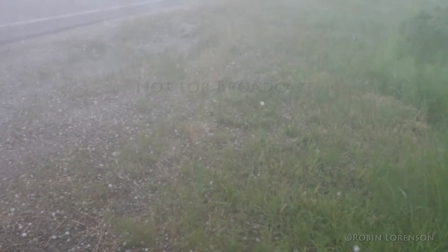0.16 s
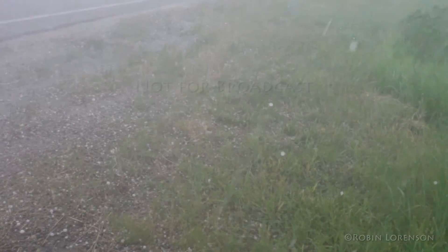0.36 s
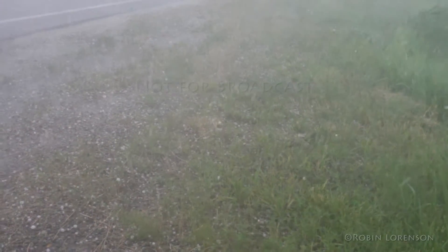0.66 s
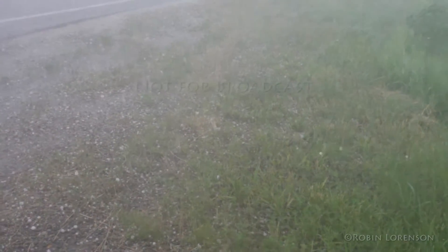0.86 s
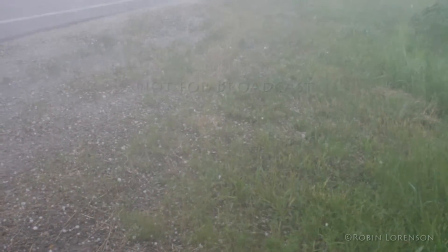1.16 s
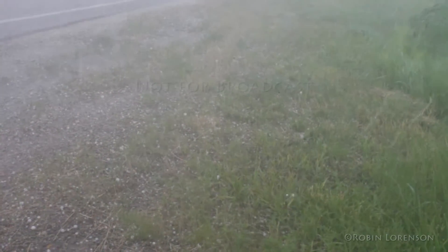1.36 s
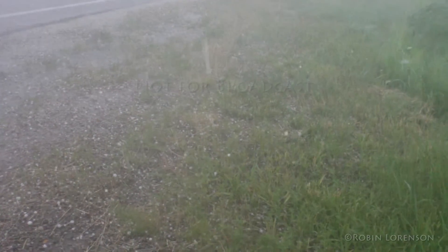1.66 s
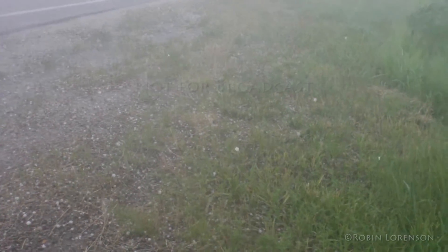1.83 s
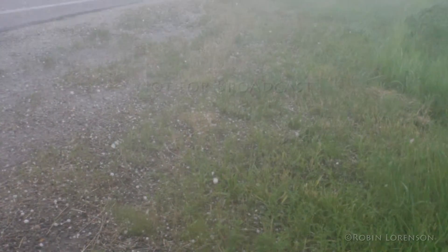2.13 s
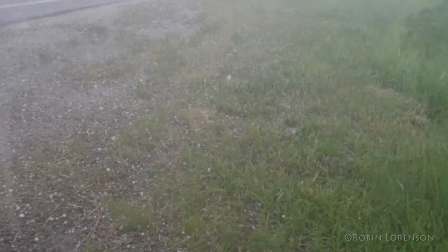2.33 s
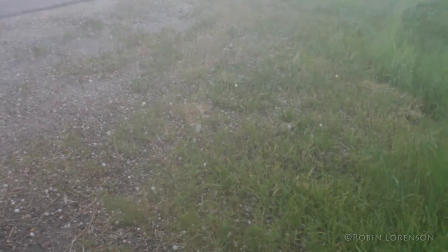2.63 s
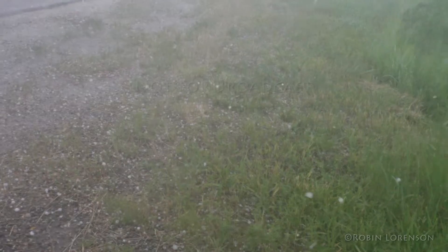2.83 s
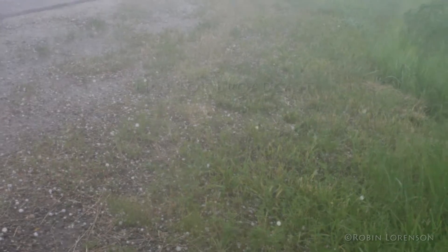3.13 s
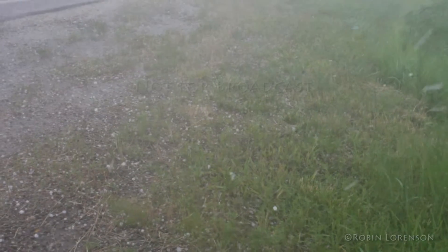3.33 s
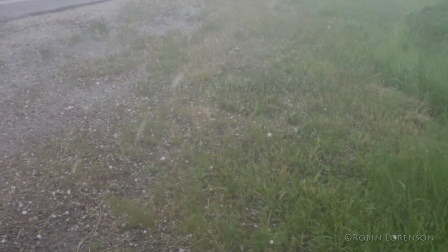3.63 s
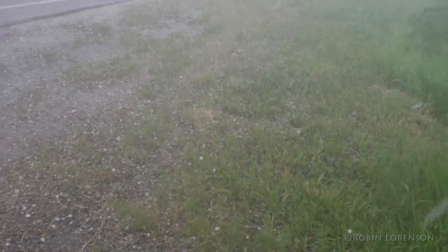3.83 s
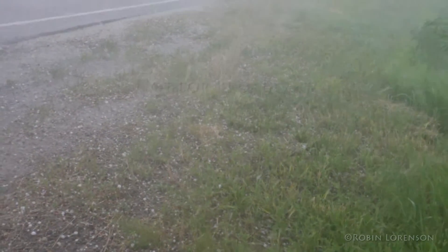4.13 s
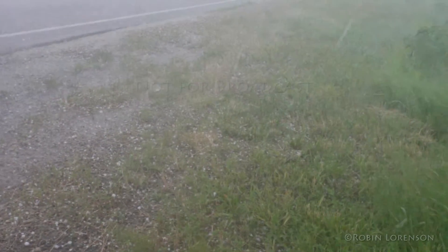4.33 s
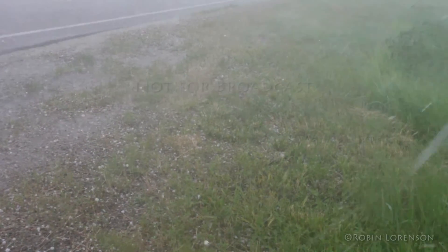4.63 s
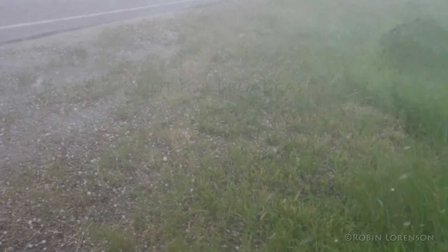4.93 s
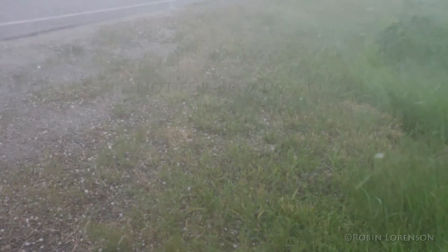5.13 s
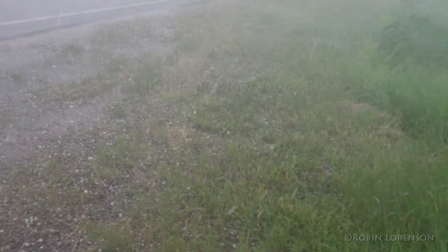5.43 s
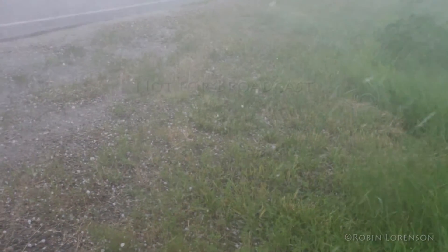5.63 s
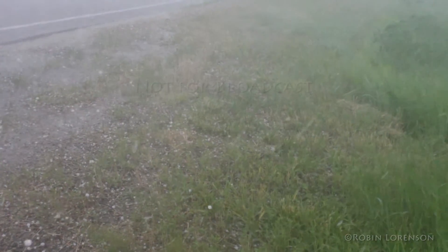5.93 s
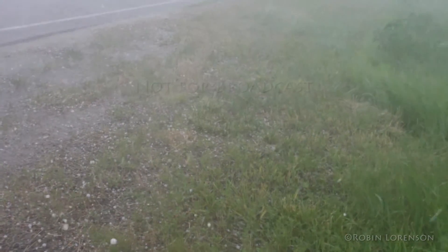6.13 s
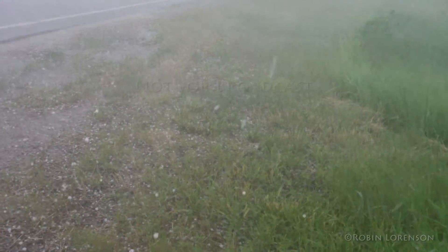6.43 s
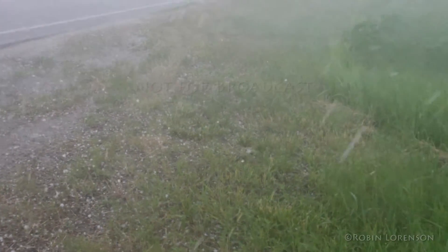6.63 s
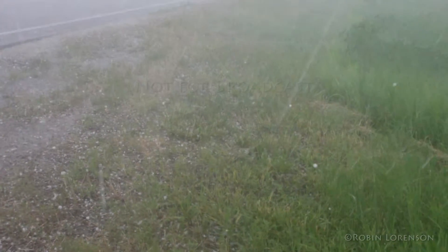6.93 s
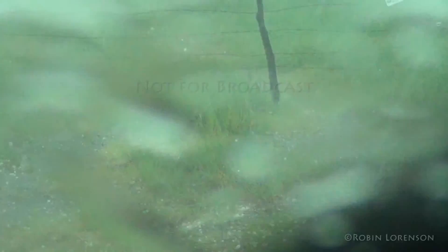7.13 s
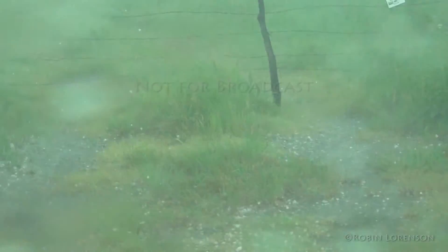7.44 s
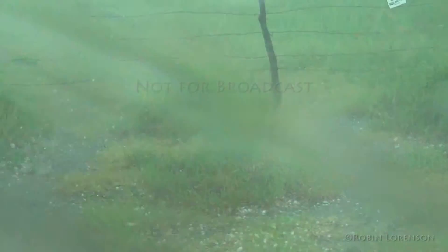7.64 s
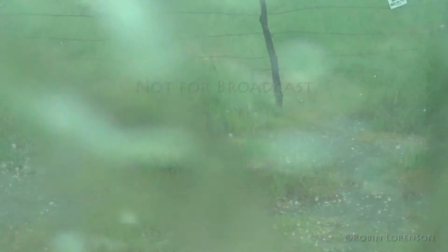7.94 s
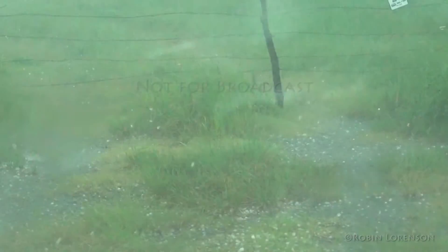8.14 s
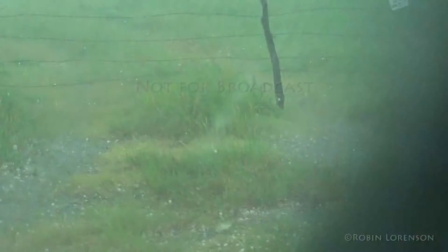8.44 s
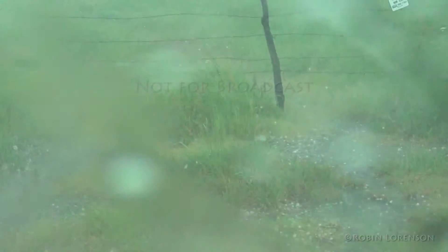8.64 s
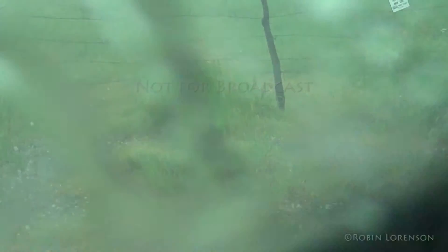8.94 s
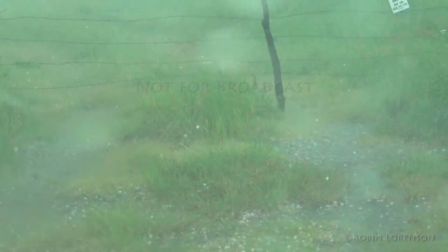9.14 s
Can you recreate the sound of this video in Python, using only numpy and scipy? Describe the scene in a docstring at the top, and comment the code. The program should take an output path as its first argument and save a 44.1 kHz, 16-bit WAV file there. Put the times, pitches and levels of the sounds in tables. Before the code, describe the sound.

Crackling hailstorm beside a parked vehicle, with scattered sharp metal knocks, cuts suddenly to a dense, booming barrage of ice heard inside the car.

```python
"""Beside a parked vehicle on gravel and grass, then inside its cabin: hail and rain.
Outside, in mono: filtered noise is the far rain and wind, dense clicks are hail on the ground, and
shaped noise bursts are stones knocking on the bodywork; a few hard stones ring.
At CUT_S the scene cuts to the cabin, in stereo: stones drum on the roof and shatter on the windshield.
Single sharp ticks run through both."""
import sys
import numpy as np
from scipy import signal
from scipy.fft import rfft, irfft
from scipy.io import wavfile
from scipy.ndimage import uniform_filter1d

SR = 44100
rng = np.random.default_rng(int(sys.argv[2]) if len(sys.argv) > 2 else 0)


def materialize(psi):
    """Save the field psi as 16-bit PCM at rate SR to the path in sys.argv[1].

    A 1-D psi becomes a single channel; in a 2-D psi each row is a channel.
    """
    bounded = np.clip(np.atleast_2d(psi).T, -1, 1)
    quanta = np.round(bounded * 32767).astype(np.int16)
    wavfile.write(sys.argv[1], SR, quanta)


N = 409248
TIME = np.arange(N) / SR  # s
CUT_S = 7.153


def amp(db):
    """Decibels to gain."""
    return 10 ** (np.asarray(db) / 20)


def unit(x):
    """Scales to rms 1."""
    return x / np.sqrt(np.mean(x ** 2) + 1e-20)


def read(points, hz):
    """A spectrum in dB, joined by straight lines on a log-frequency axis."""
    f, db = np.transpose(points)
    return np.interp(np.log(hz + 1), np.log(f), db)


def follow(curve):
    """A level curve as a gain for every sample."""
    return amp(np.interp(TIME, *np.transpose(curve)))


def bins(x):
    """The frequencies of the spectrum of x, in Hz."""
    return np.fft.rfftfreq(x.shape[-1], 1 / SR)


def tint(x, db):
    """Filters x by a gain in dB for each frequency."""
    return irfft(rfft(x) * amp(db), x.shape[-1])


def low_cut(x, hz):
    """Takes out the deep bass below hz."""
    sos = signal.butter(2, hz, "highpass", fs=SR, output="sos")
    return signal.sosfilt(sos, x + 1e-12)


def add(mix, s, sound):
    """Mixes a sound in at time s."""
    part = mix[..., max(round(s * SR), 0):][..., :sound.shape[-1]]
    part += sound[..., :part.shape[-1]]


def flutter(depth_db, per_s):
    """A randomly wavering gain: normal dB values at per_s knots, joined by lines."""
    knots_s = np.arange(0, N / SR + 1, 1 / per_s)
    return amp(depth_db * np.interp(TIME, knots_s, rng.standard_normal(len(knots_s))))


def scatter_strikes(per_s, strength_db):
    """Impulses at random times; strength_db maps a uniform draw to a level."""
    where, size = rng.random((int(per_s * N / SR), 2)).T
    return np.bincount((where * N).astype(int), amp(strength_db(size)), N)


def tick(hz, ring_cycles=0.98, scatter=0.34, scatter_s=0.00085):
    """One ice contact: a ring that dies within a few cycles, smeared by a brief scatter of grit. Peak 1."""
    t = np.arange(512) / SR
    contact = np.sin(2 * np.pi * hz * t) * np.exp(-t * hz / ring_cycles)
    grit = scatter * rng.standard_normal(len(t)) * np.exp(-t / scatter_s) * np.sqrt(hz / SR)
    grit[0] = 1  # the contact itself
    sound = signal.fftconvolve(contact, grit)[:len(t)]
    return sound / abs(sound).max()


def patter(per_s, spread_db, low_hz, high_hz, count=24):
    """Countless small stones, each kind with its own pitch; few are large. Flattened in spectrum, rms 1."""
    out = np.zeros(N)
    for hz in np.geomspace(low_hz, min(high_hz, SR / 3), count):
        clicks = scatter_strikes(per_s / count, lambda size: -spread_db * np.log(size + .06))
        out += signal.oaconvolve(clicks, unit(tick(hz)))[:N]
    f, power = signal.welch(out, SR, nperseg=256)
    return unit(tint(out, -10 * np.log10(np.interp(bins(out), f[1:], power[1:]))))


def rattle(size, per_s=130, fade_s=0.0061):
    """The uneven power of fragments that bounce and strike again; mean about 1."""
    chance, force = rng.random((2, size))
    strikes = (chance < per_s / SR) * -np.log(force + 1e-3) * SR / per_s
    keep = np.exp(-1 / (fade_s * SR))
    return signal.lfilter([1 - keep], [1, -keep], strikes)


def blow(base_t60_s, levels_db, parts, colour_db, lumps_db, grain_db, rattle_share, size=8192):
    """A stone strikes a panel: crowded modes, as shaped noise; each band has its own rise and decay."""
    t = np.arange(size) / SR
    hz = bins(t)
    centres_hz, t60_factors, rises_s = np.transpose(parts)
    grit = amp(grain_db * np.repeat(rng.standard_normal(size // 32), 32).clip(-2, 2))
    # each spot favours other modes
    lumps = lumps_db * unit(uniform_filter1d(rng.standard_normal(len(hz)), size=48))
    modes = rfft(rng.standard_normal(size) * grit) * amp(colour_db(hz) + lumps)
    out = np.zeros(size)
    for pick, t60_factor, rise_s, db in zip(np.eye(len(parts)), t60_factors, rises_s, levels_db):
        share = np.interp(np.log(hz + 1), np.log(centres_hz), pick)
        decay = np.exp(-np.log(1000) * t / (base_t60_s * t60_factor))
        envelope = (1 - np.exp(-t / rise_s)) * decay
        band = irfft(modes * np.sin(share * np.pi / 2) ** 2)
        band = band * np.sqrt(1 - rattle_share + rattle_share * rattle(size))
        out += amp(db) * unit(band * envelope) * np.sqrt(np.mean(envelope ** 2))
    return out


def part_levels(db, bright_db, balance):
    """A hard stone lifts the high parts of a blow and lowers the low ones; a slushy one does the reverse."""
    offset_db, share = np.transpose(balance)
    return db + offset_db + bright_db * share


# sheet-metal colour: [f/Hz, level/dB]
BODYWORK_COLOUR = [(40, -50), (130, -6), (300, -4.5), (1100, -1), (3000, 1.5), (6700, 9), (8200, -3.5),
                   (10000, -12), (12500, -20.5), (16000, -40)]


def bodywork_db(hz):
    """The colour of the sheet metal heard outside."""
    return read(BODYWORK_COLOUR, hz)


# cabin slope: [f/Hz, level/dB]
CABIN_COLOUR = [(15, -46), (25, -28), (70, -19.5), (137, -0.5), (291, 7), (1150, 0), (1320, -4.5),
                (1680, -6), (2970, -9.5), (4100, -16), (5230, -13), (6660, -20.5), (8970, -22),
                (13400, -25.5), (15800, -35)]
# roof panel and glass resonances: [f/Hz, width/Hz, lift/dB]
PANEL_RESONANCES = [(151, 45, 2), (302, 120, 1), (388, 31, 0.5), (695, 110, 1), (1676, 510, 8),
                    (2700, 170, 2.5)]


def cabin_db(hz):
    """The colour of the cabin: a broad slope with the panel resonances on top."""
    lift_db = sum(db / (1 + (2 * (hz - f) / width) ** 2) for f, width, db in PANEL_RESONANCES)
    return read(CABIN_COLOUR, hz) + lift_db


# filter on the diffuse sound in the cabin: [f/Hz, gain/dB]
SIDE_GAIN = [(60, -14), (110, -15), (200, -10.5), (380, -8), (700, -7), (1290, -5.5), (2380, -5.5),
             (4400, -3.5), (8120, -3.5), (15000, -10)]


def widen(mid, side):
    """Left and right from a direct sound and its diffuse twin."""
    side = tint(side, read(SIDE_GAIN, bins(side)))
    return np.array([mid + side, mid - side])


# wind: [t/s, level/dB]
GUST_LEVEL = [(0, -48), (1.8, -61), (2.1, -77), (3.98, -55), (4.1, -52), (5.3, -47), (5.7, -51),
              (7.12, -56)]
# wind colour: [f/Hz, level/dB]
WIND_COLOUR = [(20, -16), (45, 5), (90, -1), (150, -11), (260, 4.5), (450, -1.5), (1200, -33)]
# strongest buffets: [t/s, level/dB before buffet_db]
WIND_BUFFETS = [(4.111, -38), (4.21, -44), (4.439, -41), (4.56, -35), (5.16, -36), (5.329, -33.5),
                (6.129, -41), (6.49, -38), (6.624, -37.5), (6.803, -36)]


def wind(buffet_db=-2.0, buffet_hz=146, swell_s=0.026):
    """Lumpy low air as noise, with single band-limited buffets that swell and fade."""
    air = rng.standard_normal(N) * flutter(depth_db=2.2, per_s=18)
    out = follow(GUST_LEVEL) * unit(tint(air, read(WIND_COLOUR, bins(air))))
    t = (np.arange(8192) - 4096) / SR
    swell = np.exp(-(t / swell_s) ** 2 / 2)
    octaves_off = np.log2((bins(t) + 1) / buffet_hz)
    for s, db in WIND_BUFFETS:
        eddy = tint(rng.standard_normal(len(t)), -9 * octaves_off ** 2) * swell
        add(out, s + t[0], amp(db + buffet_db) * unit(eddy) * np.sqrt(np.mean(swell ** 2)))
    return out


# how hard it pours: [t/s, level/dB]
POUR_LEVEL = [(0.0, -31), (0.38, -29), (0.93, -30.5), (1.59, -29), (2.0, -32.5), (3.27, -30.5), (3.63, -34),
              (4.36, -31.5), (4.86, -27), (5.19, -28), (5.83, -26), (6.41, -30), (7.12, -28)]
# gravel and grass colour: [f/Hz, level/dB]
GROUND_COLOUR = [(40, -23), (100, -7), (192, -2.5), (350, -3), (589, -6.5), (1000, -3), (1500, -5.5),
                 (2370, -1), (3250, 0), (4860, 2.5), (6500, 6), (8200, -2), (10200, -11), (15500, -39.5)]


def downpour(wash_db=-2.0, near_db=-1.74):
    """Far rain is a smooth noise wash; nearer hail ticks on the gravel. Both follow the pour."""
    wash = rng.standard_normal(N) * flutter(depth_db=2.0, per_s=35)
    near = patter(per_s=1300, spread_db=9.0, low_hz=1190, high_hz=8660)
    ground_db = read(GROUND_COLOUR, bins(wash))
    wash = amp(wash_db) * unit(tint(wash, ground_db))
    near = amp(near_db) * unit(tint(near, ground_db))
    return follow(POUR_LEVEL) * (wash + near)


def roof_drumming(drum_db=-26.5, sleet_db=-31.5, per_s=70, ring_s=0.024, spread_db=3.5, count=8):
    """Small stones keep several roof patches drumming as decaying noise, and pepper the windshield."""
    t = np.arange(4096) / SR
    drum = np.zeros((2, N))  # direct, diffuse
    for _ in range(count):
        strikes = scatter_strikes(per_s / count, lambda size: -spread_db * np.log(size + np.exp(-2)))
        patch = rng.standard_normal((2, len(t))) * np.exp(-t / ring_s)
        drum += signal.oaconvolve(strikes[None], patch, axes=1)[:, :N]
    sleet = np.array([patter(per_s=600, spread_db=6.5, low_hz=1500, high_hz=10300, count=10) for _ in drum])
    hz = bins(drum)
    # roof lining and glass: f/Hz, gain/dB
    lining = [(30, 16.5), (150, -5.5), (1500, -11), (5000, -5), (16000, 5.5)]
    glass = [(300, -22), (1200, -13), (3200, 9.0), (5500, 3), (9000, 4.5), (16000, -12)]
    drum = amp(drum_db) * unit(tint(drum, cabin_db(hz) + read(lining, hz)))
    sleet = amp(sleet_db) * unit(tint(sleet, read(glass, hz)))
    return widen(*(drum + sleet))


# thud, clack, crack of a knock: [f/Hz, factor on t60, rise/s]
KNOCK_BANDS = [(640, 1.345, 0.0025), (2000, 1.01, 0.00015), (6360, 0.67, 0.00039)]


def small_knocks(per_s=14, level_db=-5.0, spread_db=4.0, base_t60_s=0.073):
    """Lesser stones tap the vehicle between the large ones, harder when it pours."""
    out = np.zeros(N)
    for when, *sizes in rng.random((int(per_s * CUT_S), 4)):
        levels_db = level_db + spread_db * (2 * np.array(sizes) - 1) + np.array([-3, 1, -2])
        tap = blow(base_t60_s, levels_db, KNOCK_BANDS, bodywork_db,
                   lumps_db=0.5, grain_db=0.5, rattle_share=0.38, size=4096)
        add(out, when * CUT_S, tap)
    return out * follow(POUR_LEVEL)


# thud, clang, crack, spray of a roof hit: [f/Hz, factor on t60, rise/s]
ROOF_BANDS = [(364, 1.11, 0.011), (1430, 0.9, 0.0068), (3650, 1.09, 0.0026), (9050, 0.91, 0.00051)]


def glass_cracks(per_s=26, level_db=-23.0, spread_db=12.0, base_t60_s=0.042):
    """Lesser stones rap on the windshield, each a short hard ring at its own place left to right."""
    out = np.zeros((2, N))
    span_s = N / SR - CUT_S
    for when, force, place in rng.random((int(per_s * span_s), 3)):
        levels_db = level_db + spread_db * (2 * force - 1) + np.array([-21, 0.0, 1.0, -1.5])
        rap = blow(base_t60_s, levels_db, ROOF_BANDS, cabin_db,
                   lumps_db=0.5, grain_db=1.5, rattle_share=.2, size=4096)
        add(out, CUT_S + when * span_s, rap * np.array([[1.5 - place], [.5 + place]]))
    return out


def stray_ticks(per_s=7, peak_db=-14.0, centre_hz=4600, spread_octaves=1.0):
    """Lesser stones click nearby at random, harder when it pours."""
    out = np.zeros(N)
    for when, pitch in rng.random((int(per_s * N / SR), 2)):
        hz = centre_hz * 2 ** (spread_octaves * (2 * pitch - 1))
        add(out, when * N / SR, amp(peak_db) * tick(hz, ring_cycles=0.54, scatter=0.32))
    pour = follow(POUR_LEVEL)
    return out * pour / pour.mean()


# sharpest clicks of hard stones close by: [t/s, level/dB before filters and inside_db, f/Hz]
SHARP_TICKS = [(0.6004, -12, 3500), (.625, -9, 2900), (.737, -5, 5800), (1.009, -10, 6000),
               (1.747, -21, 3020), (0.7914, -5, 5900), (1.176, -2.5, 7140), (1.316, -7, 5600),
               (1.4138, -5, 5500), (1.7927, -5, 5600), (1.9025, -5.5, 5400), (1.9309, -1, 6040),
               (2.545, -13, 5400), (2.0758, -10, 6000), (2.3675, -2.5, 6550), (2.398, -2, 4400),
               (3.515, -9, 4500), (3.6136, -11, 3500), (4.1294, -6, 6200), (4.358, -6, 6300),
               (4.409, -9, 3800), (4.9446, -10, 6500), (5.158, -4, 6000), (5.304, -4, 6300),
               (5.775, -7, 5200), (5.8627, -2, 5300), (6.0246, 8, 6900), (7.0214, 1, 7040),
               (7.11, -2, 7200), (7.3273, -4, 3800), (7.8444, -3, 4700), (7.9366, -8, 6500),
               (7.953, -2, 3000), (8.585, -15, 3000), (8.203, 0, 3060), (8.3688, -1, 4620),
               (8.639, -5, 2840), (8.9739, 6.5, 10000)]


def close_ticks(inside_db=4.0, lowest_hz=300, dull_hz=8300):
    """Single sharp ice contacts over the stray ones; outside their top is rolled off."""
    out = stray_ticks()
    for s, db, hz in SHARP_TICKS:
        add(out, s, amp(db) * tick(hz, ring_cycles=1.0, scatter=0.34))
    out = low_cut(out, lowest_hz)
    dull = signal.sosfilt(signal.butter(4, dull_hz, fs=SR, output="sos"), out)
    return np.where(TIME < CUT_S, dull, amp(inside_db) * out)


# stones that ring off something hard close by: [t/s, level/dB, f/Hz, t60/s]
HARD_PINGS = [(1.888, -2.5, 5700, 0.016), (2.544, -28, 6160, .012), (3.408, -19, 3850, 0.013),
              (4.621, -18, 8900, 0.016), (4.99, -8, 6000, 0.046), (5.159, -20, 10100, .01)]


def pings(splinter_db=-11.0, splinter_s=0.0013, detune=0.098, count=6):
    """A splintering noise snap on the onset of a cluster of close modes that ring briefly."""
    out = np.zeros(N)
    t = np.arange(4096) / SR
    for s, db, hz, t60_s in HARD_PINGS:
        modes_hz = hz * (1 + detune * rng.standard_normal((count, 1)))
        cycles = modes_hz * t + rng.random((count, 1))
        ring = unit(np.sin(2 * np.pi * cycles).sum(0)) * np.exp(-np.log(1000) * t / t60_s)
        snap = rng.standard_normal(len(t)) * np.exp(-t / splinter_s)
        add(out, s, amp(db) * (ring + amp(splinter_db) * snap))
    return out


# large stones on the bodywork: [t/s, strength/dB, brightness/dB, base t60/s, note f/Hz]
BODY_KNOCKS = [(.127, -25, 1, 0.18, 764), (.157, -22, 1, 0.12, 2270), (.233, -24.5, -2, 0.15, 1520),
               (0.287, -20.5, 1.5, 0.12, 2320), (.334, -25, 0, .11, 440), (.411, -28.5, 1.5, .15, 900),
               (.735, -20, 1.5, 0.087, 870), (0.772, -22, -0.5, 0.063, 664), (.896, -28, -3.5, 0.13, 1400),
               (1.075, -23.5, 8, 0.089, 290), (1.108, -27.5, -2, 0.059, 2000), (1.264, -23, 3, 0.15, 980),
               (1.378, -18, 1, 0.095, 870), (1.441, -24, -3, 0.062, 1000), (1.677, -25.5, -0.5, 0.18, 580),
               (1.723, -25.5, 5, 0.18, 450), (1.747, -14, -1, 0.023, 580), (1.807, -24, .5, 0.13, 440),
               (1.886, -18, 5, 0.081, 5700), (1.93, -24, -1, 0.085, 1320), (2.279, -23, -0.5, .14, 2360),
               (2.3985, -19.5, 0, 0.039, 2600), (2.544, -22.5, 6.5, .06, 290),
               (2.623, -27.5, -0.5, 0.28, 334), (2.719, -24, -6.5, 0.09, 2450),
               (2.918, -30, 0.5, 0.14, 600), (3.04, -23, 5.5, 0.15, 760), (3.116, -26.5, 3, 0.11, 440),
               (3.198, -28.5, 0.5, 0.16, 1150), (3.409, -13, 0, 0.06, 333), (3.605, -27.5, -5, 0.035, 2010),
               (3.738, -21, 4.5, 0.13, 776), (3.781, -26.5, 6, 0.1, 870), (4.004, -23.5, 1.5, 0.13, 1000),
               (4.061, -26.5, 2, 0.12, 440), (4.102, -28.5, 2.5, 0.56, 290), (4.32, -27, 0, 0.12, 6090),
               (4.382, -28.5, 0, 0.14, 2310), (4.606, -19.5, 1, 0.22, 284), (4.789, -21, -2, .09, 496),
               (4.88, -23, 2, .065, 290), (4.957, -18.5, 4, 0.053, 1900), (4.99, -20, 2, 0.029, 6000),
               (5.068, -22.5, 3, 0.15, 290), (5.217, -29, -3, 0.23, 2010), (5.567, -25.5, -6, 0.057, 2650),
               (5.603, -21.5, 0, .13, 870), (5.718, -28, 4.5, 0.28, 4720), (5.774, -21.5, 0.5, .06, 290),
               (5.874, -24.5, 4.5, .3, 780), (5.924, -22, 3, 0.12, 2650), (5.98, -26, 7.5, 0.14, 290),
               (6.282, -11, 7, 0.025, 1320), (6.377, -24, -2.5, 0.074, 1150),
               (6.654, -24, -0.5, 0.11, 2320), (6.713, -25, -2.5, 0.19, 770), (6.926, -25.5, 1, 0.21, 990),
               (6.989, -28, 3, .14, 765), (7.124, -22, 6, 0.037, 3700)]
# thud, clack, crack: [level/dB against strength, share of brightness]
KNOCK_MIX = [(-5, -1.18), (-1.07, -0.36), (3, 0.58)]


def bodywork(lowest_hz=110, note_db=-0.5, note_q=2.64):
    """Large stones knock on the vehicle; each spot of the sheet metal resonates at its own note."""
    out = np.zeros(N)
    for s, db, bright_db, base_t60_s, note_hz in BODY_KNOCKS:
        levels_db = part_levels(db, bright_db, KNOCK_MIX)
        knock = blow(base_t60_s, levels_db, KNOCK_BANDS, bodywork_db,
                     lumps_db=2.0, grain_db=2.8, rattle_share=0.048)
        note = signal.lfilter(*signal.iirpeak(note_hz, note_q, fs=SR), knock)
        add(out, s, knock + amp(note_db) * note)
    return low_cut(out, lowest_hz)


# large stones on roof and glass: [t/s, strength/dB before level_db, brightness/dB]
LARGE_ROOF_HITS = [(7.158, -21.5, 3.5), (7.181, -18, -1.5), (7.223, -17.5, 0.5), (7.265, -20.5, 2),
                   (7.326, -20, 0.5), (7.381, -19, -2.5), (7.412, -19, -1), (7.454, -17.5, 0),
                   (7.498, -25.5, -1), (7.585, -18.5, -0.5), (7.647, -16, -2), (7.707, -18.5, -4),
                   (7.753, -23, 3), (7.788, -21, -10), (7.803, -16.5, -11), (7.843, -25.5, 1),
                   (7.892, -19, 1.5), (7.951, -17, 1), (7.975, -27, 3), (7.997, -29.5, 11),
                   (8.07, -18, -0.5), (8.111, -24.5, 1), (8.133, -19.5, 1.5), (8.201, -19, -10),
                   (8.239, -16.5, 0), (8.292, -22, 1), (8.32, -25.5, 0), (8.345, -18, -8),
                   (8.366, -18.5, -2), (8.411, -20.5, 4), (8.483, -20.5, 0.5), (8.511, -20.5, 1),
                   (8.583, -17.5, -1.5), (8.637, -21.5, -2.5), (8.676, -25, 8.5), (8.694, -29.5, 11),
                   (8.733, -23.5, -16), (8.752, -19, -3.5), (8.839, -17, -2.5), (8.87, -18.5, 0),
                   (8.906, -13, -16), (8.96, -16.5, -4.5), (9.009, -27, 8.5), (9.043, -25, -11),
                   (9.101, -21.5, 4), (9.128, -16, -6), (9.156, -17, -1.5), (9.234, -16, -1)]
# thud, clang, crack, spray: [level/dB against strength, share of brightness]
ROOF_MIX = [(2.45, -0.34), (-0.76, -0.33), (-0.5, 0.28), (-2.5, 0.98)]


def roof_hits(level_db=-1.0, diffuse_db=-2.0, pan_db=-1.5, base_t60_s=0.19, contact_base_t60_s=0.032):
    """Large stones smack roof and glass, left or right; the panel rings on while fragments rattle."""
    out = np.zeros((2, N))
    for s, db, bright_db in LARGE_ROOF_HITS:
        levels_db = part_levels(db, bright_db, ROOF_MIX)
        direct, diffuse = (blow(base_t60_s, levels_db, ROOF_BANDS, cabin_db,
                                lumps_db=4.0, grain_db=2.5, rattle_share=0.77) for _ in range(2))
        contact = blow(contact_base_t60_s, levels_db, ROOF_BANDS, cabin_db,
                       lumps_db=1.5, grain_db=3.0, rattle_share=0, size=4096)
        add(direct, 0, contact)
        pan = amp(pan_db * rng.uniform(-1, 1) * np.array([[1], [-1]]))
        add(out, s, pan * widen(direct, amp(diffuse_db) * diffuse))
    return amp(level_db) * out


def scene():
    """Outside until the cut, inside after it; close ticks in both."""
    outside = wind() + downpour() + small_knocks() + pings() + bodywork()
    inside = roof_drumming() + glass_cracks() + roof_hits()
    return np.where(TIME < CUT_S, outside, inside) + close_ticks()


def record(dry, threshold_db=-11.5, recovery_db_per_s=300, edge_hz=15900):
    """A quick limiter holds the big blows down, tanh rounds the peaks, then the band limit."""
    power_db = 10 * np.log10(abs(uniform_filter1d((dry ** 2).mean(0), size=64)) + 1e-12)
    fall_db = TIME * recovery_db_per_s
    held_db = np.maximum.accumulate(power_db + fall_db) - fall_db  # instant rise, steady fall
    over_db = np.maximum(held_db - threshold_db, 0)
    limited = dry / amp(signal.lfilter(np.ones(32) / 32, 1, over_db))
    band_limit = signal.firwin(511, edge_hz, window=("kaiser", 9), fs=SR)
    return signal.oaconvolve(np.tanh(limited), band_limit[None], "same", axes=1)


dry = scene()
out = record(dry)
materialize(out)
```